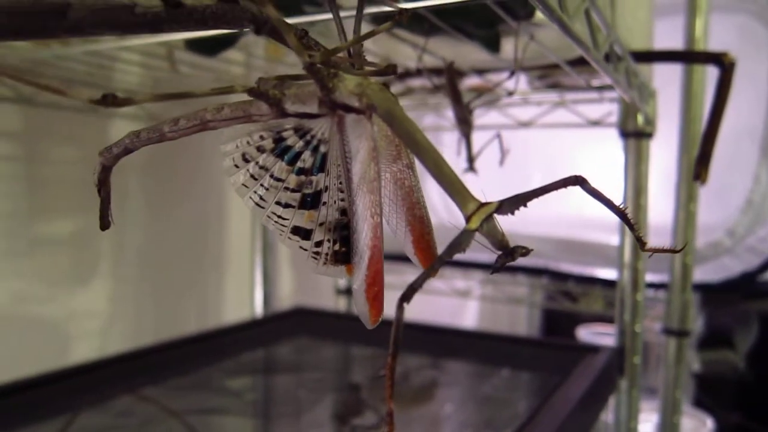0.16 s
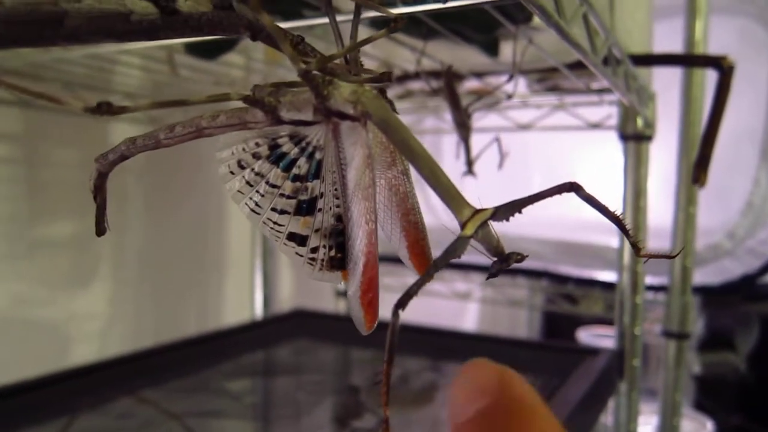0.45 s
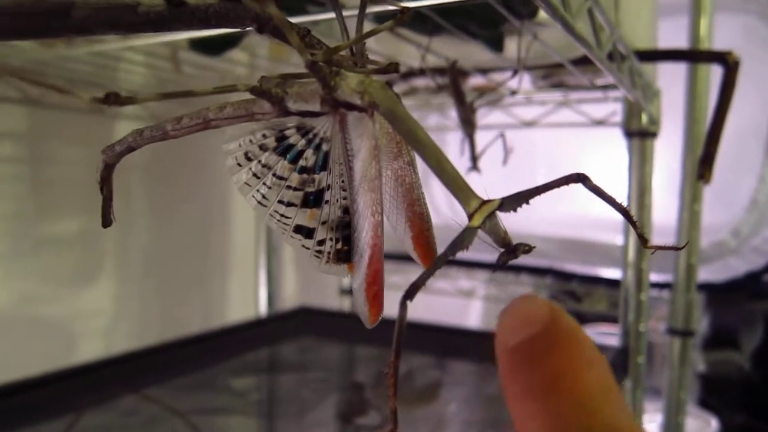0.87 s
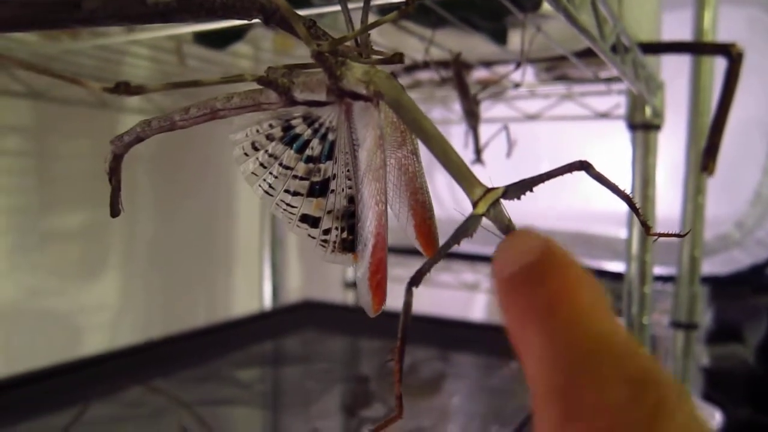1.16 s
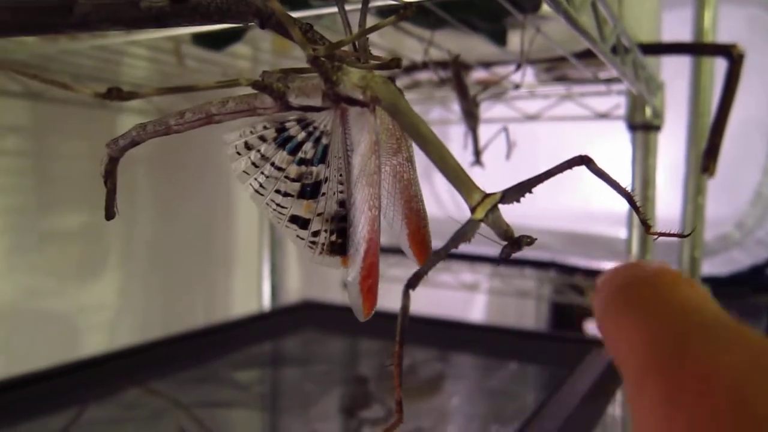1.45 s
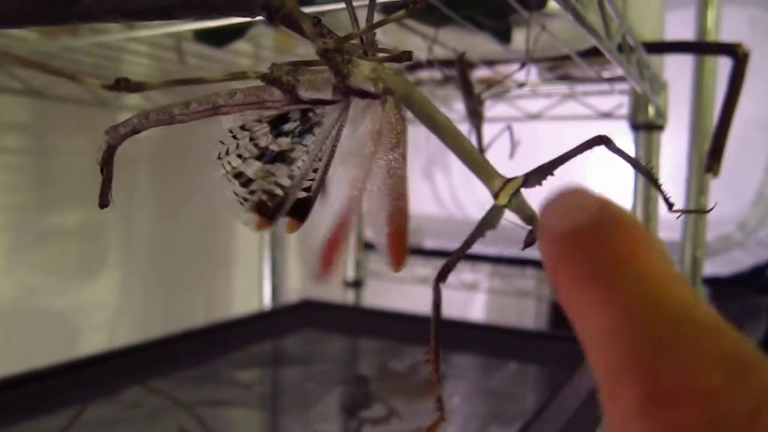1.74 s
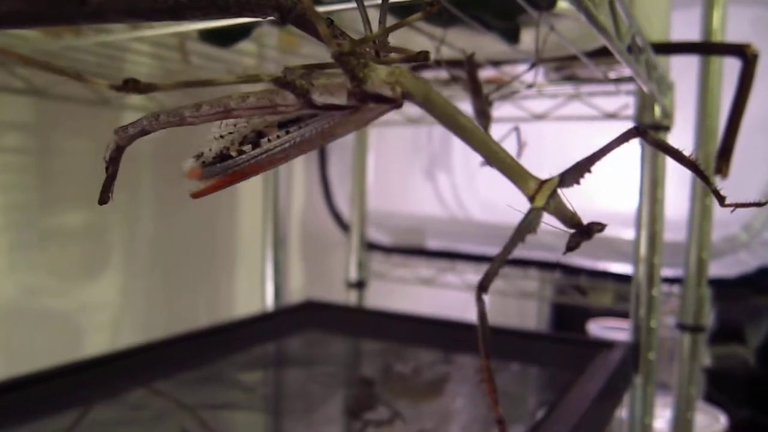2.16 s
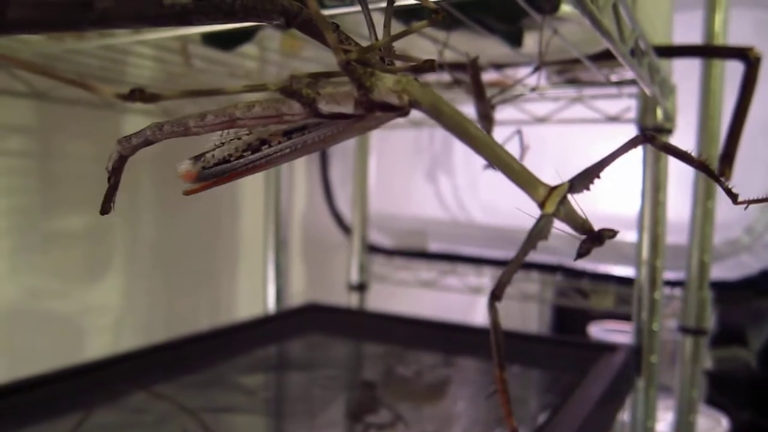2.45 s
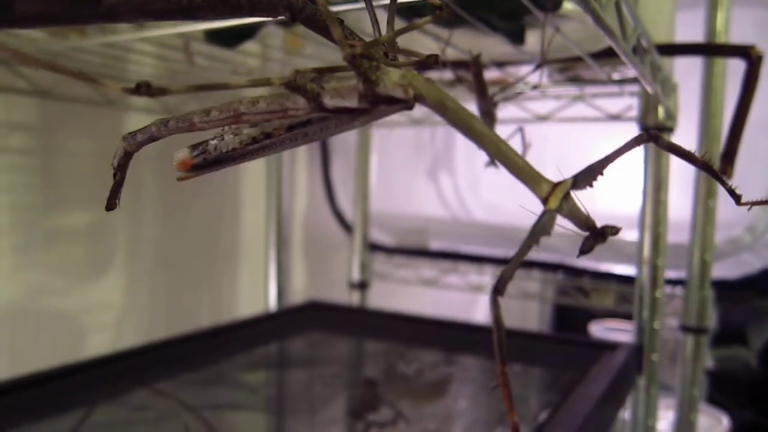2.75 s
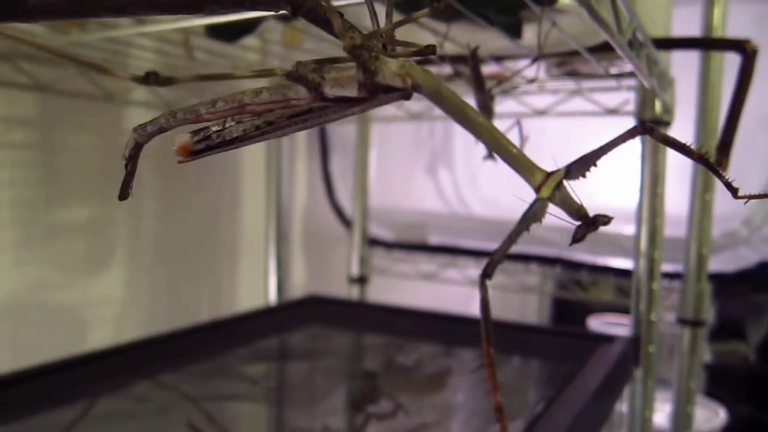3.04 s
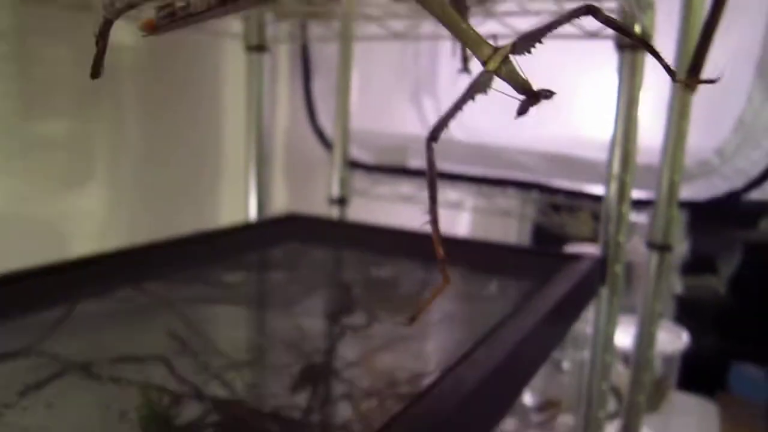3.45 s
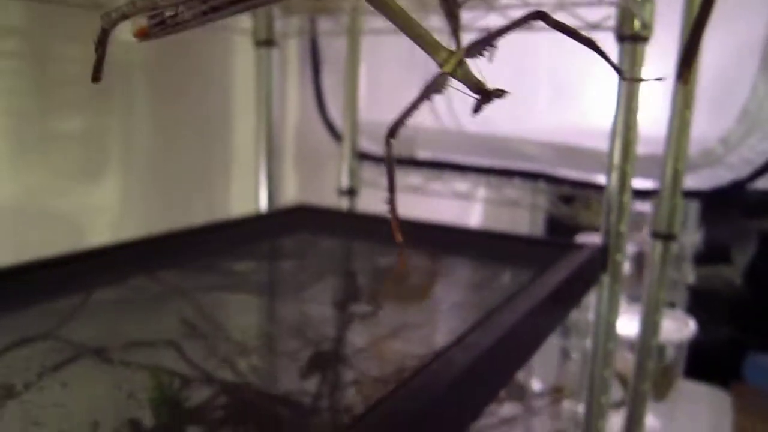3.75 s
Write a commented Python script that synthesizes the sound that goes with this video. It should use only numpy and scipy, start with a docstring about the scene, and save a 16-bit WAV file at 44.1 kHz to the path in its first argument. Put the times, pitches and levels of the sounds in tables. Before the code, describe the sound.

Faint, dry wing rustles come in a few short flicks as an insect folds its wings close to the microphone. Then the hand-held camera's plastic casing creaks, snaps and thumps, louder, over quiet room hiss and appliance hum.

```python
"""A mantis flicks and folds its wings close to a hand-held camera, each flick a spray of dry grains,
with a few brief handling rubs and ticks among them. Near the end the hand shifts its grip: friction
rings the plastic casing, which creaks, snaps and thumps right at the close pair of microphones.
Behind it lies a quiet room, with appliance hum, a faint whine, room air and microphone hiss."""
import sys
import numpy as np
from scipy import signal
from scipy.fft import rfft, irfft
from scipy.io import wavfile
from scipy.ndimage import uniform_filter1d

SR = 44100
rng = np.random.default_rng(int(sys.argv[2]) if len(sys.argv) > 2 else 0)


def waveform_to_disk(signal):
    """Save audio, clipped to [-1, 1], as 16-bit WAV at the path in sys.argv[1]."""
    frames = np.transpose(np.atleast_2d(signal))
    scaled = np.clip(frames, -1, 1) * 32767
    samples = np.round(scaled).astype(np.int16)
    wavfile.write(sys.argv[1], SR, samples)


N = 171549


def dry_rustles():
    """Dry, grainy rustles close to the microphones: wing flicks, plus a few handling rubs and ticks."""
    # Each row: start in seconds, low-band level in dB, dying time in seconds,
    # high band over low in dB, left minus right in dB.
    rustles = [(0.073, -50.5, .008, -12, -1), (1.132, -51.5, 0.029, -5.5, -2), (1.172, -54, 0.063, -5, -1),
               (1.210, -52.5, 0.054, -6, -3), (1.262, -53, 0.017, -12, -1), (1.288, -62, 0.024, -6, -1),
               (1.605, -52, 0.013, -9, 2), (1.62, -57.5, 0.032, -8, -4), (1.695, -60, .01, -12, -2),
               (1.775, -58, 0.029, 1, -4), (1.798, -53.5, 0.0092, -8, -2), (1.817, -64, 0.012, 6.5, 1),
               (1.858, -68, .02, 7, -1), (2.258, -52, 0.0033, -4, -1), (2.646, -53, .01, -3, 1),
               (2.812, -59.5, .012, 0, 0)]
    bands_hz = (2130, 6850), (9700, 12800)
    grains_per_s, grain_spread_db = 9000, 2
    out, size = np.zeros((2, N)), SR // 4
    for start, db, fall_s, bright_db, pan_db in rustles:
        grains = (rng.random(size) < grains_per_s / SR) * amp(grain_spread_db * rng.exponential(1, size))
        spray = grains * noise_pair(likeness=0.23, size=size)
        low, high = (unit_rms(butter(spray, 3, band, "band")) for band in bands_hz)
        envelope = amp(db) * burst(rise_s=0.0051, fall_s=fall_s, size=size)
        add(out, start, envelope * (low + amp(bright_db) * high) * pan(pan_db))
    return out


def casing_creaks():
    """Bursts of friction ring the plastic casing; each microphone hears every mode by its own path."""
    # Casing modes. Each row: pitch in Hz, relative level in dB, seconds to ring down by 60 dB.
    modes = [(1000, 3, 0.017), (1457, 5.5, 0.022), (2397, 6.5, 0.029), (3036, 3.5, 0.028),
             (3530, 3, 0.0064), (3430, -7, 0.055), (4000, 7, 0.008), (4200, -5.5, 0.046),
             (4820, 13.5, 0.0044), (5850, 11.5, 0.0088), (6700, 6, 0.009), (7550, 14, .004),
             (8520, 23.5, 0.0027), (10500, 9.5, .004), (10900, 13, 0.0067), (13000, 20, 0.0041),
             (14100, 0, .0025), (15100, -13.5, .002)]
    # The seven pitches, in Hz, at which a contact's colour is set.
    colour_hz = (1500, 2350, 3300, 4700, 7000, 10500, 14000)
    # Contacts on the casing. Each row: start, rise and dying time in seconds, share of the ring time
    # the grip leaves, seven colour levels in dB, left minus right in dB in the bass and in the treble.
    contacts = [(2.258, .0005, .002, 0.65, -66, -66, -58, -49, -68, -62, -64, -1, 4),
                (2.647, 0.00022, .002, 0.62, -78, -64, -70, -46.5, -67, -55, -60, -2, -2),
                (3.2267, 0.00031, 0.00058, 1, -64, -69, -62, -32, -53, -40, -54, 2, -1),
                (3.309, 0.0035, .008, 0.42, -50, -65, -55, -57, -60, -65, -67, 0, -5),
                (3.323, 0.0079, 0.003, 0.46, -47, -58, -46, -52.5, -44, -52.5, -59, -8.5, -3),
                (3.3358, 0.00042, 0.0019, 0.21, -45.5, -44, -34, -29.5, -45, -34.5, -50, -6, -2),
                (3.338, 0.0036, .03, 0.23, -50.5, -68, -55, -57, -51, -65, -63, -7.5, -2.5),
                (3.36, 0.016, .03, .3, -62.5, -70, -59, -54, -58.5, -67.5, -67.5, -7, -3),
                (3.381, .0005, 0.0017, 0.33, -57, -46, -37, -50.5, -50.5, -61.5, -63, -2.5, -8.5),
                (3.390, .0005, .0007, 0.4, -60, -52, -63.5, -50.5, -35, -62.5, -69.5, -14.5, -10),
                (3.392, .0015, .001, 0.15, -60.5, -45, -66, -27, -48, -38.5, -56.5, 9, 9),
                (3.3944, 0.00045, 0.00083, 0.34, -28, -20.5, -21, -26, -21, -27.5, -48, 2, -6),
                (3.399, 0.0013, .005, 0.48, -37.5, -60, -62, -62, -43.5, -63, -59.5, -3, 5),
                (3.509, .001, 0.0018, 0.35, -67, -64, -63, -48, -60, -71, -67, -5, 0),
                (3.539, 0.0015, 0.0079, 0.19, -42.5, -69, -58, -43.5, -61.5, -43, -54, -7, -7),
                (3.543, 0.00077, 0.0018, 0.33, -42, -50, -42, -48, -40, -57, -46, -14, -3),
                (3.562, .001, 0.0023, 0.46, -58, -61, -47, -65, -53, -69.5, -70, -1, -4),
                (3.580, 0.0079, .01, 0.18, -67, -70, -55, -53, -72, -69, -69, -2, -10),
                (3.6125, 0.00015, 0.00018, 1, -31, -33.5, -22, -20.5, -24.5, -16.5, -23, -2, 1),
                (3.696, 0.0012, 0.0016, .4, -62, -62, -62, -52.5, -59, -59, -57.5, -1, -9),
                (3.719, 0.031, 0.042, 0.37, -58, -70, -74, -57, -70, -78, -70, 2, -2)]
    bass_hz, treble_hz, path_spread_db = 2000, 11000, 1.5
    polarity = (-1) ** np.arange(len(modes))[:, None, None]
    out, size = np.zeros((2, N)), SR // 5
    for start, rise_s, fall_s, ring_share, *colour_db, bass_pan_db, treble_pan_db in contacts:
        envelope = burst(rise_s, fall_s, size)
        friction = noise_pair(likeness=.8, size=size) * envelope
        paths = polarity * amp(path_spread_db * rng.standard_normal((len(modes), 2, 1)))
        colour = list(zip(colour_hz, colour_db))
        balance = [(bass_hz, bass_pan_db), (treble_hz, treble_pan_db)]
        for path, (hz, db, t60) in zip(paths, modes):
            damped_t60 = t60 * ring_share
            mode = ring(friction, hz, damped_t60)
            # A longer contact and a longer ring give the mode more energy.
            energy = np.sum(envelope ** 2) * damped_t60 * 1000 / (4 * np.log(1000))
            mode *= np.sqrt(energy / np.sum(mode ** 2, axis=1, keepdims=True))
            add(out, start, path * amp(db + at_hz(colour, hz)) * mode * pan(at_hz(balance, hz)))
    out[1] = np.roll(out[1], 2)   # reaches the right microphone two samples later
    return out


def grip_thumps():
    """A soft push, opposite in the two microphones, vents and swings back; the casing rings and booms."""
    # Each row: start and length in seconds, then left push, right push, ring and boom in dB.
    thumps = [(3.3994, .0013, -17, -20, -25, -31), (3.538, .0035, -42, -31, -50, -44),
              (3.543, .003, -44, -32, -50, -44), (3.560, .008, -46, -38, -60, -48)]
    vent_hz = 59.4
    out, samples = np.zeros((2, N)), np.arange(SR // 10)
    for start, length_s, left_db, right_db, ring_db, boom_db in thumps:
        push = np.sin(np.pi * np.minimum(samples / SR / length_s, 1)) ** 2
        vented = amp([[left_db], [right_db]]) * butter(push, 2, vent_hz, "high") * [[-1], [1]]
        release = samples == int(length_s * SR)
        ringing = amp(ring_db) * ring(release, hz=1050, t60=.025) * [[1], [-1]]
        boom = amp(boom_db) * ring(push / push.sum(), hz=237, t60=0.054) * pan(db=-3)
        add(out, start, vented + ringing + boom)
    return out


def appliance_tones():
    """Hum and whines of appliances in the room: sines that wander a little; the whines fade late on."""
    # Hum first, then whines. Each row: pitch in Hz, base rms level in dB, pitch wander in Hz,
    # left minus right in dB.
    tones = [(119.9, -63.5, 3.74, -7.5), (1470, -68.5, 1.77, -2.5), (3387, -80, 8.7, -6),
             (8770, -84, 2, 13.5), (8823, -91, 1.3, -1)]
    # Fade of the whines. Each row: time in seconds, gain in dB.
    whine_fade = [(0, 3.5), (2.9, 2), (3.2, -10), (3.89, -11)]
    fade_db = np.interp(np.arange(N) / SR, *np.transpose(whine_fade))
    out, waver_db = np.zeros((2, N)), 0.5
    for k, (hz, db, wander_hz, pan_db) in enumerate(tones):
        phase = 2 * np.pi * np.cumsum(hz + wander_hz * drift(size=3000)) / SR
        level_db = db + fade_db * (k > 0) + waver_db * drift(size=2000)
        out += amp(level_db) * np.sqrt(2) * np.sin(phase) * pan(pan_db)
    return out


def room_air():
    """Room air and microphone hiss: gently wavering noise, most alike on both sides in the low middle."""
    # Each row: frequency in Hz, relative noise density in dB.
    density = [(15, -38.5), (28, -3.5), (64, -0.5), (150, -2.5), (300, -7), (530, -10.5), (1260, -14),
               (1520, -14), (1750, -16.5), (3500, -23), (6500, -28.5), (7600, -33), (8200, -44),
               (8800, -33), (9800, -30.5), (12500, -31.5), (16000, -38.5)]
    # Each row: frequency in Hz, correlation between the microphones.
    likeness = [(60, 0.24), (150, 0.042), (380, 0.46), (950, 0.35), (2380, 0.16), (5980, 0.084),
                (15000, 0.11)]
    # Each row: frequency in Hz, left minus right in dB.
    balance = [(60, -2), (240, -3.5), (950, -2.5), (3770, -2.0), (15000, -0.5)]
    level_db, waver_db = -48, .3
    hz = np.maximum(np.fft.rfftfreq(N, 1 / SR), 10)
    mid, side = rfft(rng.standard_normal((2, N)))
    colour_db = at_hz(density, hz) + at_hz(balance, hz) / 2 * [[1], [-1]]
    spectrum = left_right(mid, side, at_hz(likeness, hz)) * amp(colour_db)
    return amp(level_db + waver_db * drift(size=2000)) * unit_rms(irfft(spectrum, N))


def amp(db):
    return 10 ** (np.asarray(db) / 20)


def unit_rms(x):
    return x / np.sqrt(np.mean(x ** 2) + 1e-20)


def butter(x, order, hz, kind):
    return signal.sosfilt(signal.butter(order, hz, kind, fs=SR, output="sos"), x)


def at_hz(points, hz):
    """Read a (Hz, value) table on a log axis."""
    knots_hz, values = np.transpose(points)
    return np.interp(np.log(hz), np.log(knots_hz), values)


def pan(db):
    """Left and right gains for a level difference."""
    return amp([[db / 2], [-db / 2]])


def left_right(mid, side, likeness):
    """Mix two independent noises into channels whose correlation is `likeness`."""
    return (np.sqrt(1 + likeness) * mid + np.sqrt(1 - likeness) * side * [[1], [-1]]) / np.sqrt(2)


def noise_pair(likeness, size):
    """White noise, partly alike at the two microphones."""
    return left_right(*rng.standard_normal((2, size)), likeness)


def ring(x, hz, t60):
    """A unit click sets a sine of height 1 ringing, 60 dB down after t60 seconds."""
    r, w = amp(-60 / (t60 * SR)), 2 * np.pi * hz / SR
    return signal.lfilter([0, np.sin(w)], [1, -2 * r * np.cos(w), r * r], x + 1e-18)


def burst(rise_s, fall_s, size):
    """Straight rise, exponential fall."""
    t = np.arange(size) / SR
    return np.minimum(t / rise_s, np.exp(-np.maximum(t - rise_s, 0) / fall_s))


def drift(size):
    """Slow random wander of rms 1, smoothed over `size` samples."""
    return unit_rms(uniform_filter1d(uniform_filter1d(rng.standard_normal(N), size), size))


def add(out, start_s, x):
    i = int(start_s * SR)
    out[:, i:i + x.shape[1]] += x[:, :N - i]


def scene():
    """The quiet room, with the mantis and the hand close up."""
    return room_air() + appliance_tones() + dry_rustles() + casing_creaks() + grip_thumps()


def record(dry):
    """The microphone ports notch the treble; deep bass and top are cut, and the sound stops short."""
    notches_hz, width_hz, depth_db = np.array([8150, 8370]), 800, -35
    stop_s, cutoff_hz = 3.8425, 15730
    a, floor = np.pi * width_hz / SR, amp(depth_db)
    cosines = np.cos(2 * np.pi * notches_hz / SR)
    notches = [[1 + a * floor, -2 * c, 1 - a * floor, 1 + a, -2 * c, 1 - a] for c in cosines]
    x = signal.sosfilt(np.divide(notches, 1 + a), dry)
    x = butter(x, order=1, hz=15, kind="high")
    x *= np.arange(N) < stop_s * SR
    return signal.sosfilt(signal.ellip(10, .5, 60, cutoff_hz, fs=SR, output="sos"), x)


dry = scene()
out = record(dry)
waveform_to_disk(out)
```